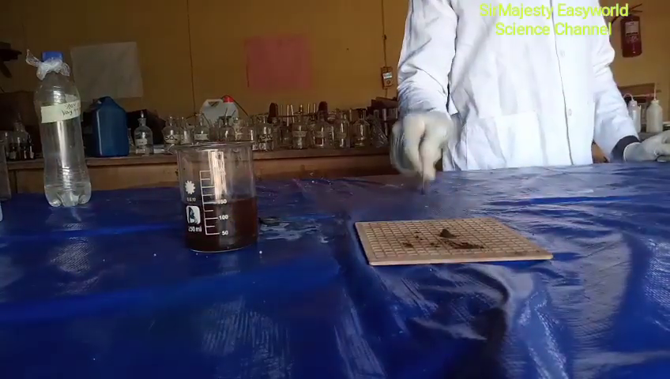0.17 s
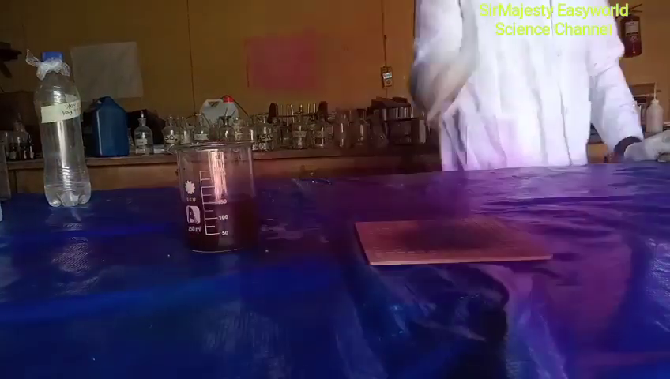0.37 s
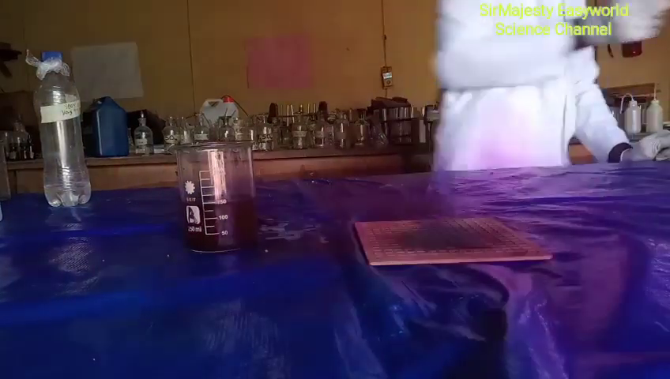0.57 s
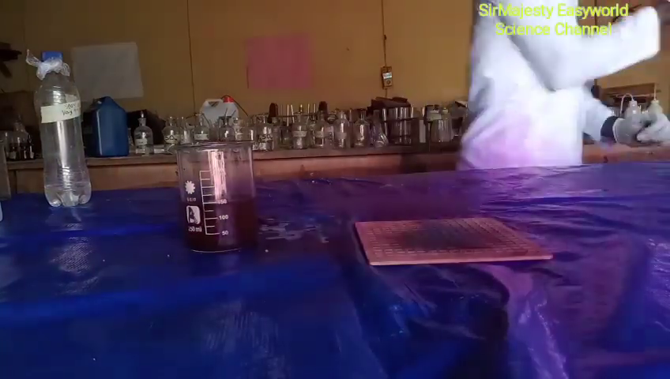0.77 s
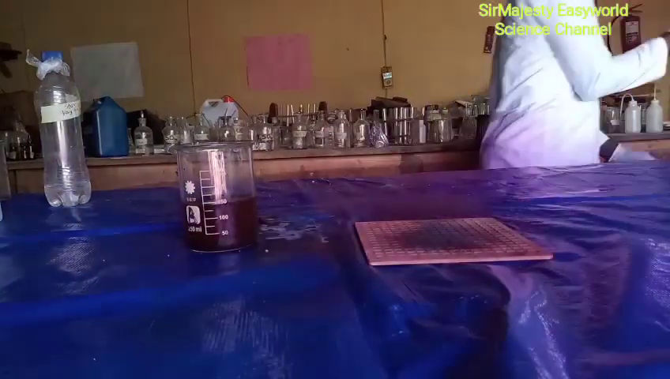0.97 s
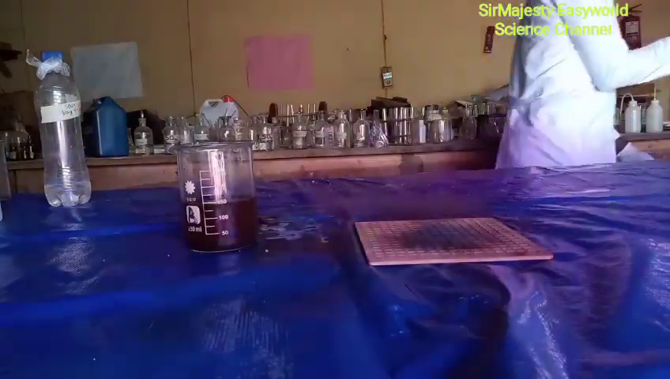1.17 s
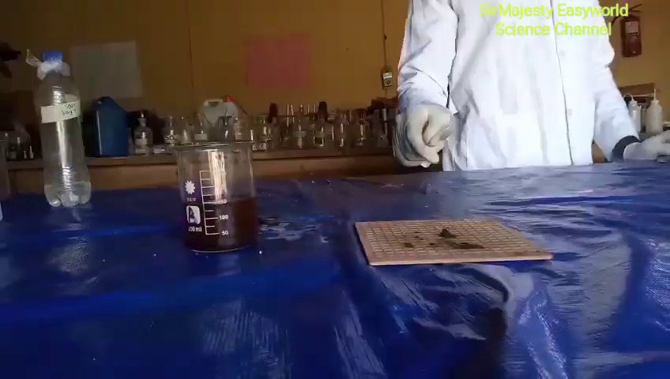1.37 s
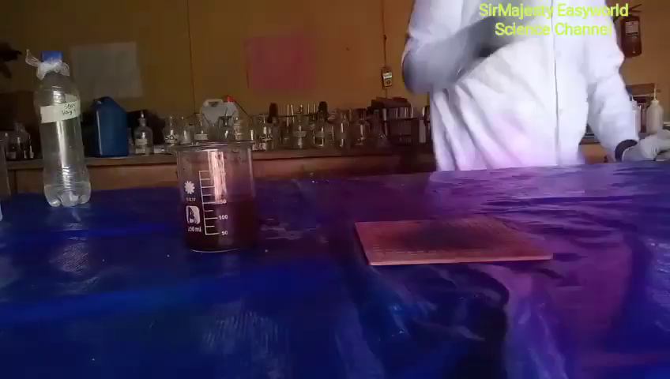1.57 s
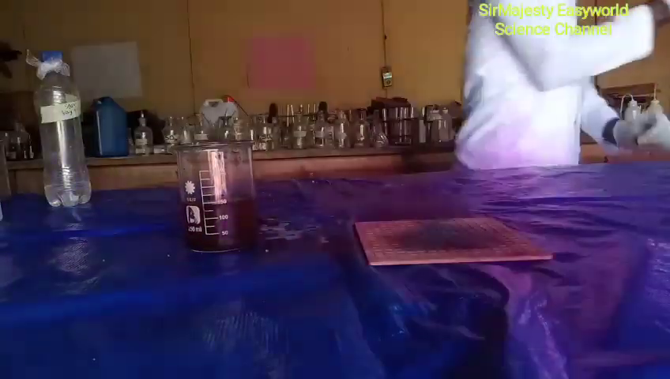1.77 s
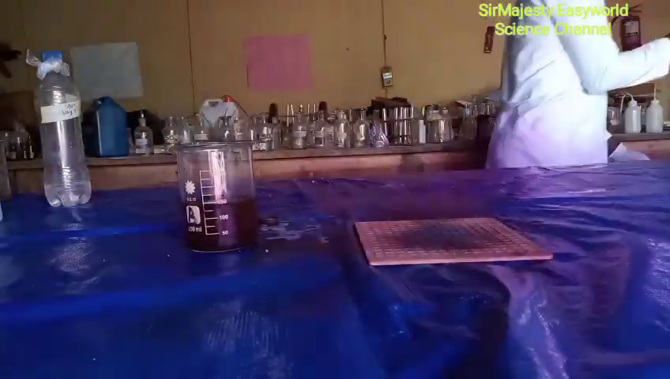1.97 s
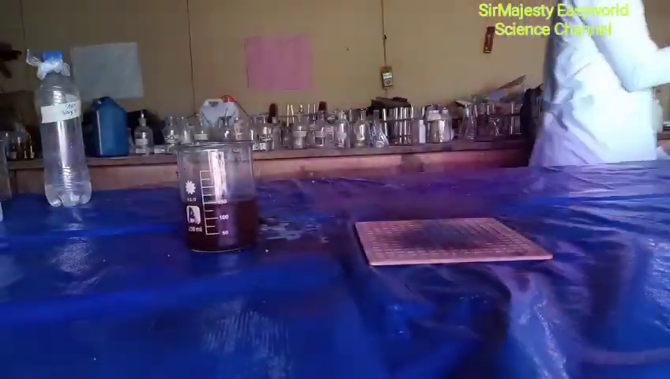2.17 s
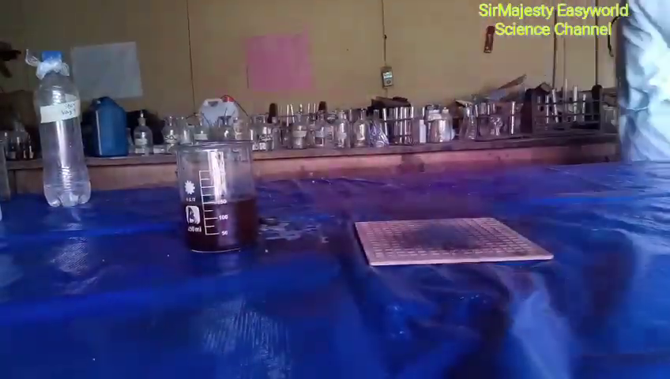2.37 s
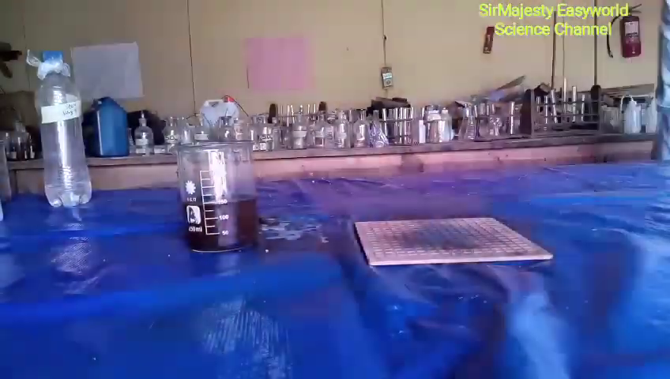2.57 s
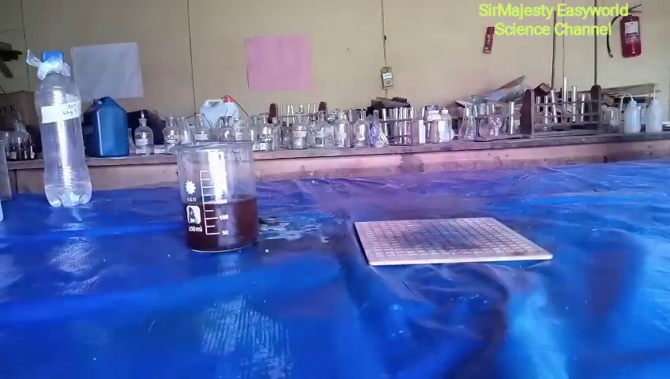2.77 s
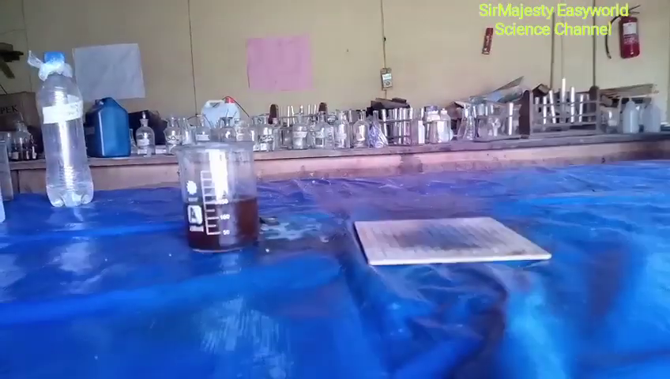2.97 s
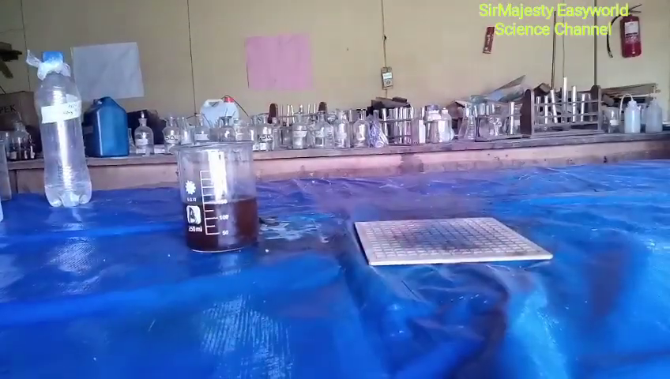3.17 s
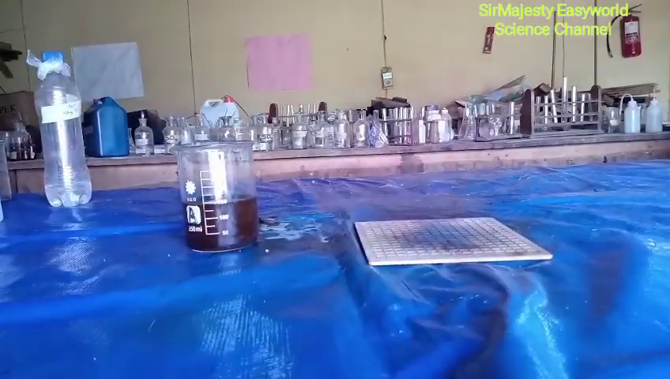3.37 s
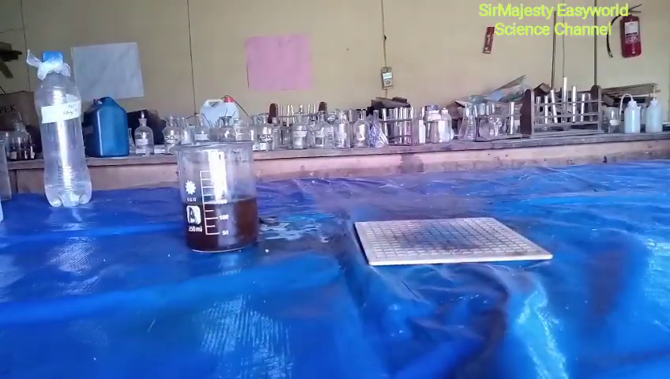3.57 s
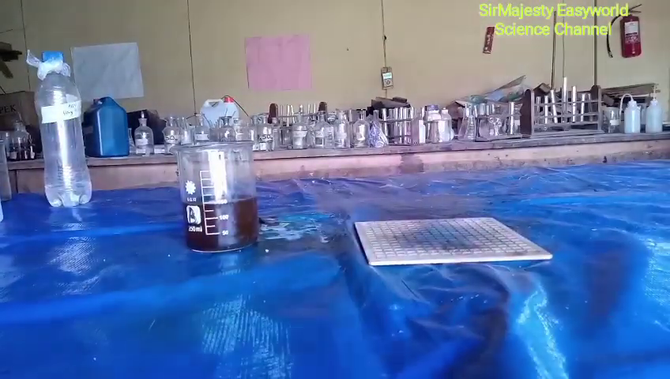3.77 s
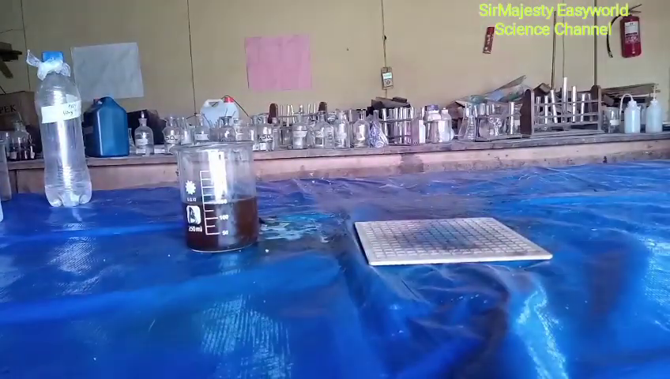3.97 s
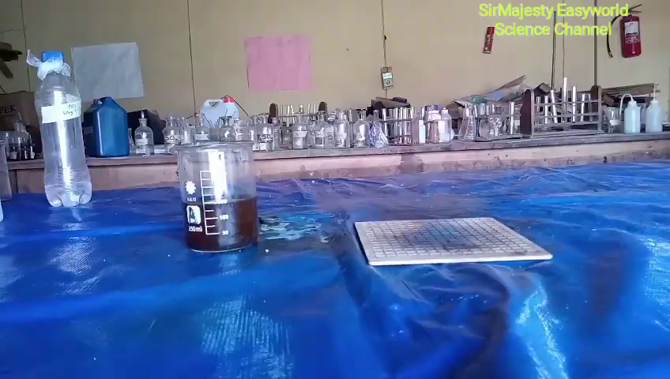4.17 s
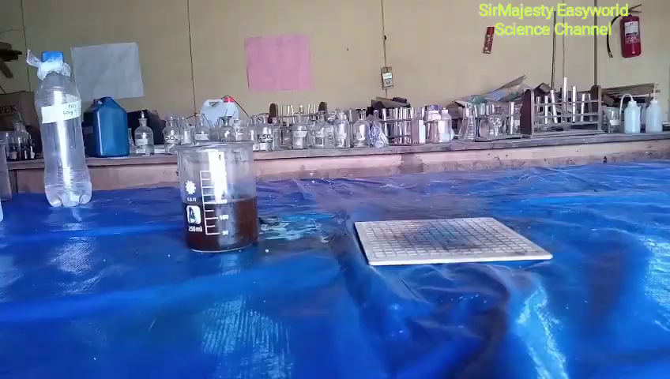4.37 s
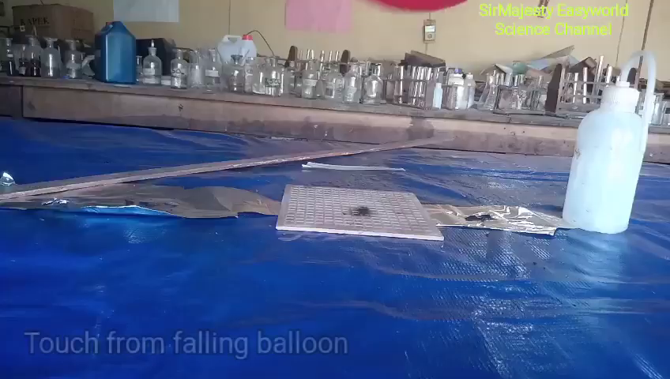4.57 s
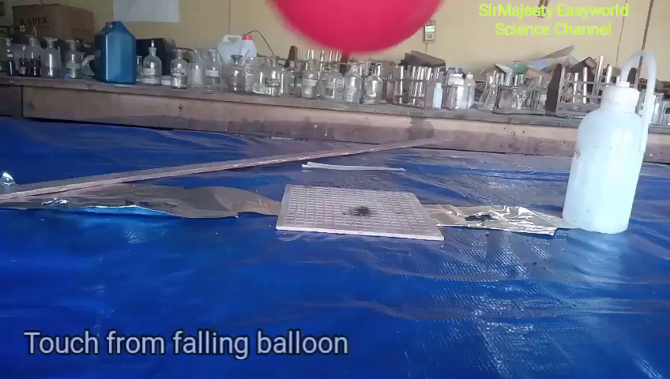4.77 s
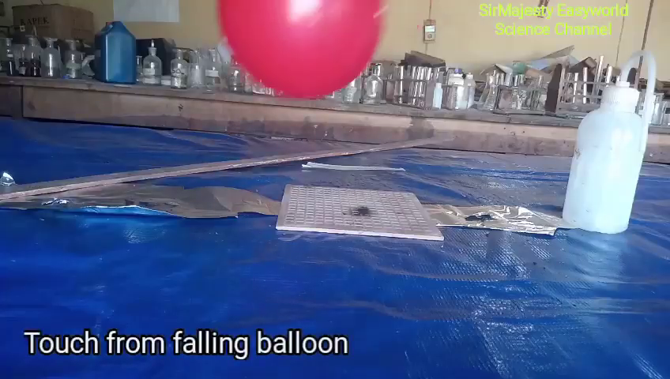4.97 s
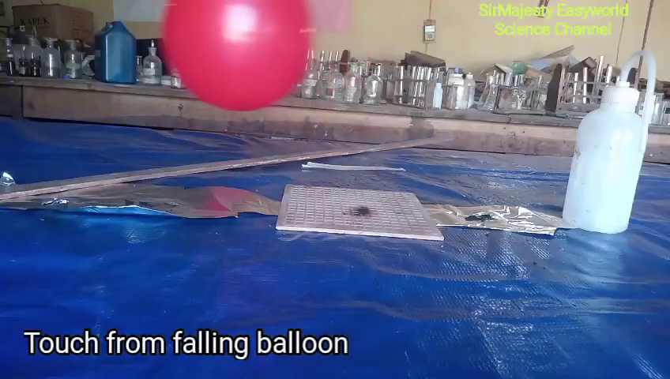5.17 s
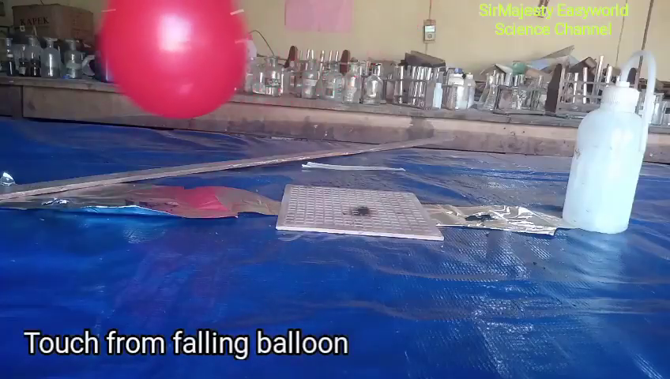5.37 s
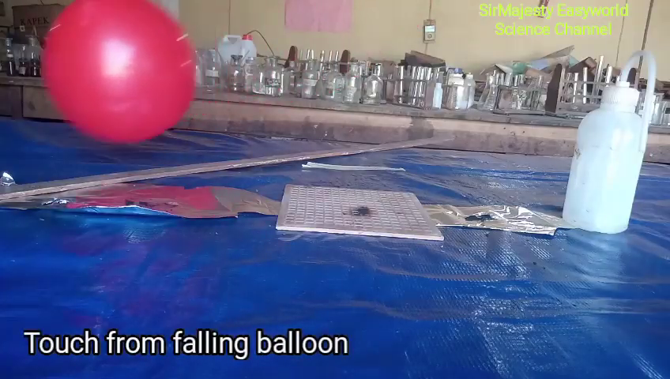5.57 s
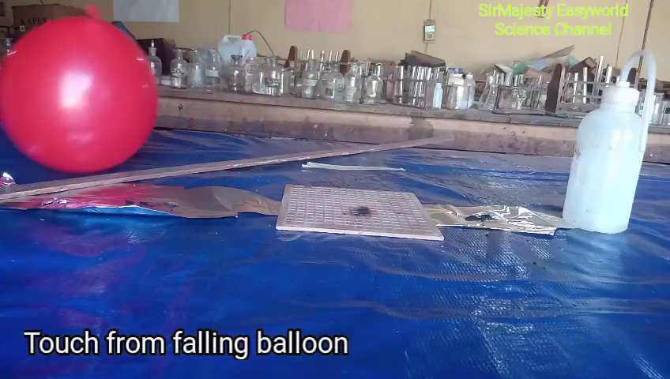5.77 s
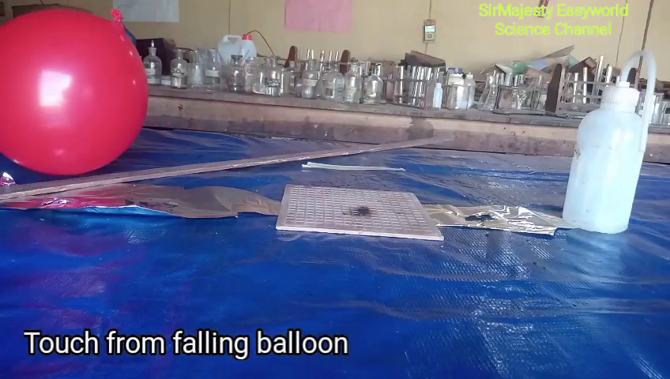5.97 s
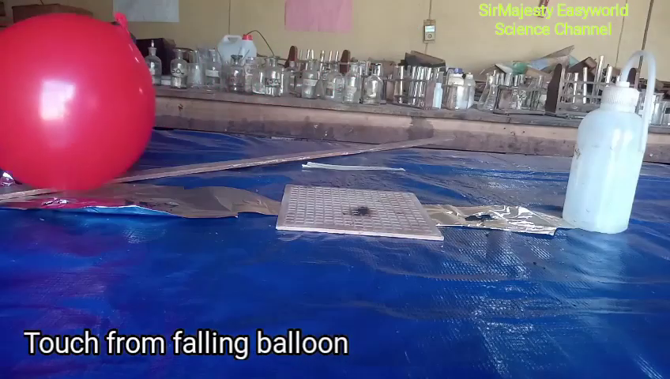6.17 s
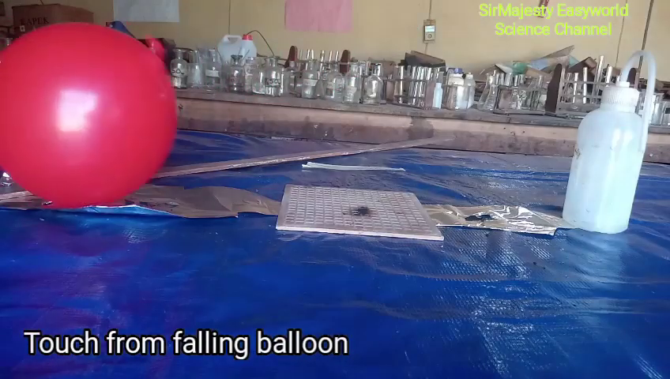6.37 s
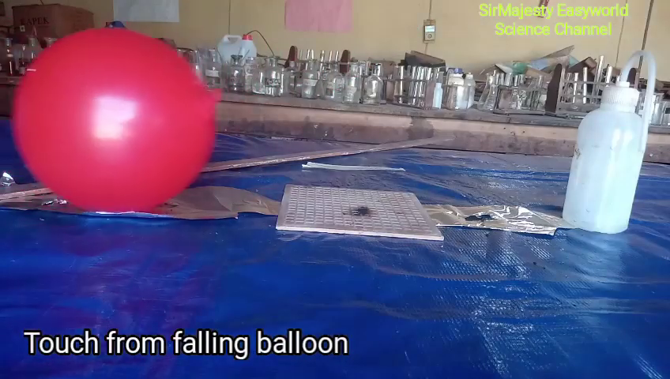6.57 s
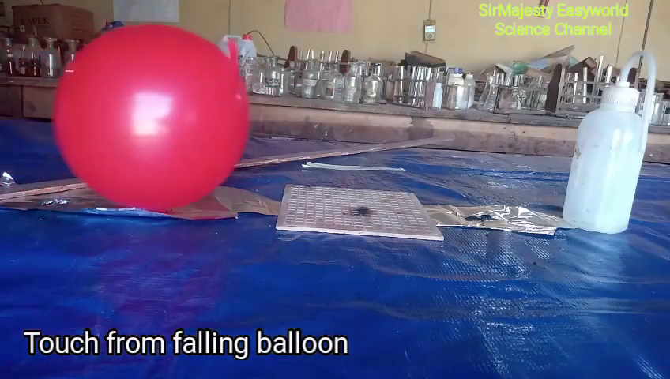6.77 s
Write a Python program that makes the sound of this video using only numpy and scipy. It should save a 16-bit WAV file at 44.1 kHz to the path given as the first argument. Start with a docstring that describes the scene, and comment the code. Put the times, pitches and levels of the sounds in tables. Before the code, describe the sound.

A phone microphone captures two tiny powder detonations in a bare-walled lab: tap, huge clipped bang, decaying roar, then a quick cut and a shorter, faster version. The hush after holds soft building rumble, clothing strokes, small ticks, regular faint clicks and far bird notes. The sound cuts dead, then a small engine hums and throbs roughly nearby, while a balloon skin brushes past with two sharp ticks.

```python
"""In a hard-walled lab, a small powder pile detonates on a tile after a tap of the tool, then replays faster:
the tap comes closer to the blast and the ring dies away sooner. Each blast is a shock pulse with decaying
room noise and ringing glass, and overloads a phone microphone. Behind it the building rumbles, clothes
rustle (both shaped noise) and a far bird sings in rough glides. After a silent cut a small generator drones
nearby, harmonics plus throbbing noise, and a balloon brushes past as bright crackling noise."""
import sys
import numpy as np
from scipy import signal
from scipy.fft import rfft, irfft, next_fast_len
from scipy.io import wavfile
from scipy.ndimage import uniform_filter1d, map_coordinates

SR = 44100
rng = np.random.default_rng(int(sys.argv[2]) if len(sys.argv) > 2 else 0)


def nominal_scale(level):
    """Amplitude ratio for a level in decibels (scalar or array-like)."""
    x = np.asarray(level, float) / 20
    return 10 ** x


def generate_wav(sig):
    """Save sig (samples, or channels by samples) to the path in sys.argv[1] as 16-bit PCM at SR."""
    pcm = np.round(np.clip(np.atleast_2d(sig).T, -1, 1) * 32767).astype(np.int16)
    wavfile.write(sys.argv[1], SR, pcm)


N = 304290  # length [samples]
T = np.arange(N) / SR  # time [s]


def unit(x):
    """Scale to rms 1."""
    return x / np.sqrt(np.mean(x ** 2) + 1e-20)


def along(points, hz):
    """(Hz, value) points read on a log frequency axis."""
    f, v = np.transpose(points)
    return np.interp(np.log(hz + 1), np.log(f + 1), v)


def wobble(rate):
    """A smooth random curve, rate knots a second."""
    knots = rng.standard_normal(int(N * rate / SR) + 4)
    return map_coordinates(knots, [T * rate])


def coloured(x, spectrum):
    """x through a (Hz, dB) spectrum, causal: the folded cepstrum gives the least delay."""
    m = 2 * next_fast_len(len(x) // 2 + 8192)
    gain_db = along(spectrum, np.fft.rfftfreq(m, 1 / SR))
    cepstrum = irfft(np.log(nominal_scale(gain_db)), m)
    cepstrum[1:m // 2] *= 2
    cepstrum[m // 2 + 1:] = 0
    return irfft(rfft(x, m) * np.exp(rfft(cepstrum)), m)[:len(x)]


def swells(rows, rise_s, fall_db_per_s):
    """Gain of events that rise, hold and die away."""
    total = 0
    for s, held, db in rows:
        fall_db = fall_db_per_s * np.clip(T - s - held, 0, None)
        total = total + nominal_scale(db - fall_db) * np.clip((T - s) / rise_s, 0, 1)
    return total


def loudness(x, size):
    """Running rms of the last size samples."""
    return np.sqrt(np.abs(uniform_filter1d(x ** 2, size=size, origin=size // 2)) + 1e-12)


def add(track, s, sound):
    """Mix a sound in at time s."""
    part = track[round(s * SR):][:len(sound)]
    part += sound[:len(part)]


# the hard walls' decay at pace 1: (frequency [Hz], t60 [s])
LAB_DECAY = [(60, 0.4), (250, 0.65), (1000, 0.77), (2500, 0.72), (5500, 0.65), (9000, 0.43)]


def tail(spectrum, pace):
    """Room noise starting at rms 1, each frequency dying at its own rate times pace."""
    hz, t, z = signal.stft(rng.standard_normal(2 * SR), SR, nperseg=512)
    decay_db = 60 * pace * t / along(LAB_DECAY, hz)[:, None]
    z = z * nominal_scale(along(spectrum, hz)[:, None] - decay_db)
    sound = signal.istft(z, SR, nperseg=512)[1][:2 * SR]
    return sound / np.std(sound[:1024])


def in_room(x, wet_db, pace):
    """x and the lab's answer to it."""
    room = tail([(500, 0)], pace)  # one level at all frequencies
    return x + nominal_scale(wet_db) * signal.fftconvolve(x, room / np.linalg.norm(room))[:N]


# still air: (frequency [Hz], relative density [dB per Hz])
STILL_SPECTRUM = [(100, -22.5), (280, -2.5), (500, -10.5), (1500, -15.5), (3000, -20.5), (5500, -17),
                  (7000, -18.5), (16000, -25)]


def still_air():
    """The lab's noise floor, a steady noise that wavers slightly."""
    return nominal_scale(-67.0 + 1.5 * wobble(6.1)) * unit(coloured(rng.standard_normal(N), STILL_SPECTRUM))


# swells of the building: (start [s], time from start to fall [s], level [dB])
RUMBLE_SWELLS = [(-.02, .3, -49.5), (.36, 0.039, -61), (1.23, 0.06, -56), (1.32, 0.047, -61),
                 (1.52, 0.089, -55), (1.67, 0.059, -48), (2.17, 0.064, -55), (2.36, .05, -56.5),
                 (2.46, 0.036, -59.5), (2.54, .2, -56), (2.94, .08, -54), (3.09, 0.057, -62),
                 (3.36, 0.11, -60.5), (3.82, 0.053, -68), (4.0, .1, -53), (4.16, 0.13, -53),
                 (4.36, 0.073, -63)]
# its colour: (frequency [Hz], relative density [dB per Hz])
RUMBLE_SPECTRUM = [(15, -28.5), (40, -11.5), (62, 10), (90, -6.5), (150, -6), (250, -22), (600, -31),
                   (1500, -52.5)]


def rumble():
    """The building's low noise, lumpy, swelling over a faint rest level."""
    rest_db = -67
    lumps = nominal_scale(rest_db) + swells(RUMBLE_SWELLS, rise_s=0.03, fall_db_per_s=300.5)
    return lumps * nominal_scale(2.5 * wobble(30)) * unit(coloured(rng.standard_normal(N), RUMBLE_SPECTRUM))


# far bird's notes: (start [s], end [s], first pitch [Hz], last pitch [Hz], level [dB])
BIRD_NOTES = [(2.348, 2.43, 3360, 3440, -60.5), (2.5, 2.59, 3575, 3220, -53.5),
              (2.581, 2.718, 3000, 2816, -63.5), (2.91, 3.014, 3280, 3420, -61.5),
              (3.02, 3.082, 3440, 3450, -55), (3.079, 3.15, 2950, 3130, -63.5),
              (3.198, 3.299, 3390, 3340, -61), (3.249, 3.335, 3015, 2885, -61.5)]


def bird():
    """Far, gliding notes, roughened by noise around their pitch and smeared by the walls."""
    blur = 550  # knots a second of the noise that widens each note
    out = np.zeros(N)
    for start, stop, first_hz, last_hz, db in BIRD_NOTES:
        u = (T - start) / (stop - start)  # 0 to 1 over the note
        phase = 2 * np.pi * np.cumsum(first_hz + (last_hz - first_hz) * u) / SR
        shape = np.clip(6 * np.minimum(u, 1 - u), 0, 1)
        rough_tone = wobble(blur) * np.cos(phase) + wobble(blur) * np.sin(phase)
        out += nominal_scale(db + 3.45 * wobble(50)) * shape * unit(rough_tone)
    return in_room(out, wet_db=-7.5, pace=2.5)


# strokes of cloth: (start [s], time from start to fall [s], level [dB])
RUSTLE_STROKES = [(1.4, 0.037, -47), (2.345, 0.054, -48.5), (2.49, 0.16, -46), (2.7, 0.077, -70),
                  (2.9, 0.09, -51.5), (3.113, 0.026, -56), (3.295, 0.018, -63), (3.39, 0.017, -64),
                  (3.512, .04, -58), (3.565, 0.036, -49), (3.65, .08, -67.5), (4.05, .02, -56),
                  (4.14, .04, -58.5), (4.2, 0.092, -66), (4.43, .07, -66.5)]
# cloth's colour: (frequency [Hz], relative density [dB per Hz])
CLOTH_SPECTRUM = [(600, -43.5), (1500, -18), (2500, -21), (4000, -7), (5500, -2), (8000, -5), (16000, -9.5)]


def rustle():
    """Clothes: strokes of bright noise, each with a rough surface."""
    strokes = swells(RUSTLE_STROKES, rise_s=0.023, fall_db_per_s=263)
    return strokes * nominal_scale(0.85 * wobble(110)) * unit(coloured(rng.standard_normal(N), CLOTH_SPECTRUM))


# engine orders: (multiple of the firing rate, level at 5.7 s [dB], drift [dB per s])
ENGINE_ORDERS = [(2, -52.5, 1.5), (4, -57, -5), (5, -61.5, -8), (6, -50, -3.5), (7, -53, -7),
                 (8, -40.5, 2.5), (9, -46.5, 5.5), (10, -52.5, 8), (12, -43.5, 0.6), (13, -57.5, 3),
                 (14, -51.5, -6.5), (17, -60.5, 11), (18, -57, -4), (20, -46, 7), (22, -75, 10),
                 (26, -65.5, -12), (28, -49.5, 0.5), (40, -48.5, 1.3)]
# exhaust roar: (frequency [Hz], relative density [dB per Hz])
ROAR_SPECTRUM = [(15, -33.5), (40, -16), (92, -9), (190, -8.5), (363, -14), (775, -12), (900, -11.5),
                 (1400, -12.5), (1800, -20), (4000, -16.5), (8000, -21), (16000, -25)]


def generator():
    """Orders of the firing rate drift and waver in strength; the exhaust roar throbs once a firing."""
    firing_hz, sag_from_s, sag_hz_per_s = 23.23, 5.25, 0.27
    roar_db = -35.5
    hz = firing_hz - sag_hz_per_s * np.clip(T - sag_from_s, 0, None)
    phase = 2 * np.pi * np.cumsum(hz) / SR
    since = T - 5.7
    tones = 0
    for order, db, drift in ENGINE_ORDERS:
        strength = nominal_scale(db + drift * since + 2.46 * wobble(2.8))
        tones = tones + strength * np.sin(round(order) * phase + 0.54 * wobble(3.7))
    throb = 1 + 0.047 * np.cos(phase) + 0.023 * np.cos(2 * phase)
    noise = unit(coloured(rng.standard_normal(N), ROAR_SPECTRUM))
    return tones + nominal_scale(roar_db + 0.61 * wobble(12)) * throb * noise


# a balloon's skin brushes past: (start [s], time from start to fall [s], level [dB])
BALLOON_BRUSHES = [(5.575, .085, -29), (5.79, .05, -33)]
# single ticks of rubber: (time [s], level [dB])
RUBBER_TICKS = [(5.607, -17), (5.641, -18)]


def balloon():
    """A short bright crackle of rubber: twice-differenced noise in brushes and ticks."""
    noise = unit(np.diff(rng.standard_normal(N + 2), 2))
    ticks = swells([(s, 0, db) for s, db in RUBBER_TICKS], rise_s=0.00024, fall_db_per_s=6000)
    brushes = swells(BALLOON_BRUSHES, rise_s=0.02, fall_db_per_s=600) * nominal_scale(4 * wobble(60))
    return (brushes + ticks) * noise


# tool on tile: (time [s], relative level [dB])
TOOL_TAPS = [(0.1242, -22.5), (0.1296, -23), (1.523, -36.5), (1.532, -38.5), (1.543, -38.5), (2.53, -41),
             (2.553, -48), (3.985, -54.5), (4.055, -55), (4.161, -55), (4.22, -55)]
# the tile's modes: (frequency [Hz], relative level [dB], t60 [s])
TILE_MODES = [(619, -16, .03), (1265, -14, .02), (1744, -7, .035), (2800, -10, .012), (3316, -2, .014),
              (4565, -6, .018), (5260, -5, .014), (6379, -10, .014)]
# falling crumbs: (time [s], level [dB])
CRUMB_FALLS = [(0.101, -40.5), (1.4017, -56.5), (2.281, -30), (3.063, -52), (3.1183, -58), (3.5182, -59.5),
               (3.5733, -46), (4.0527, -60)]


def taps():
    """The tool knocks the tile's modes; crumbs land as bright ticks; the room answers both."""
    out, t = np.zeros(N), np.arange(SR // 4) / SR
    for s, db in TOOL_TAPS:
        ring = 0
        for hz, mode_db, t60 in TILE_MODES:
            ring = ring + nominal_scale(mode_db + rng.normal(0, 1.4) - 60 * t / t60) * np.sin(2 * np.pi * hz * t)
        knock_noise = nominal_scale(0.5 - 60 * t / 0.024) * np.diff(rng.standard_normal(len(t) + 1))
        add(out, s, nominal_scale(db - 5.0) * (ring + knock_noise))
    for s, db in CRUMB_FALLS:
        add(out, s, nominal_scale(db - 60 * t / 0.0076) * np.diff(rng.standard_normal(len(t) + 1)))
    return in_room(out, wet_db=-7, pace=1.7)


# the blast and its faster replay: (time [s], level [dB], playback pace, heard in the decay [1 = normal])
BLAST_AND_REPLAY = [(0.4848, 21.5, 0.98), (1.7287, 20, 1.64)]
# the room's answer to the blast: (frequency [Hz], relative density [dB per Hz])
BLAST_ANSWER = [(30, -45), (70, -46), (140, -15), (250, -18.5), (400, -16.5), (1150, -10.5), (2000, -7.5),
                (3000, -11.5), (8000, -11.5), (16000, -14.5)]
# glassware left ringing: (frequency [Hz], relative level [dB], t60 at pace 1 [s])
GLASS_MODES = [(2024, -40, 1.27), (4877, -52, 1.3)]


def blasts():
    """A shock front, a strong early burst, the long room answer and shaken glass; pace shortens the decays."""
    out, t = np.zeros(N), np.arange(2 * SR) / SR
    for s, db, pace in BLAST_AND_REPLAY:
        shock = (1 - t / 0.0011) * np.exp(-t / 0.0004)
        early = 1 + nominal_scale(-5.5 - 60 * pace * t / 1.0)
        glass = 0
        for hz, glass_db, t60 in GLASS_MODES:
            glass = glass + nominal_scale(glass_db - 60 * pace * t / t60) * np.sin(2 * np.pi * hz * t)
        blast = shock + early * tail(BLAST_ANSWER, pace) + glass
        next_cut = min(start for start, _, _ in SILENT_CUTS if start > s)
        add(out, s, nominal_scale(db) * blast * (s + t < next_cut))  # the ring ends at the next cut
    return out


def scene():
    """Lab background up to the last cut, generator after it, and all the single events, one channel."""
    in_lab = T < SILENT_CUTS[-1][0]
    background = (still_air() + rumble() + rustle()) * in_lab + generator() * ~in_lab
    return (background + bird() + balloon() + taps() + blasts())[None]


# phone microphone, a port resonance, then a steep fall: (frequency [Hz], gain [dB])
MICROPHONE_RESPONSE = [(3000, 0.43), (4000, -4), (4800, 0.5), (5600, 7), (6300, -1), (7300, -9),
                       (8300, -20), (12000, -35), (15300, -23.5), (16000, -30.5)]


def microphone(x):
    """Colours the sound; gain control holds loud sound at one level as far as its range goes."""
    x = coloured(x, MICROPHONE_RESPONSE)
    gain_db = np.clip(-19 - 20 * np.log10(loudness(x, size=1301)), -12, 0)
    return x * nominal_scale(uniform_filter1d(gain_db, size=441))


# filter after the overloaded stage: (frequency [Hz], gain [dB])
OUTPUT_RESPONSE = [(30, -0.5), (75, -6), (140, 1.5), (400, 0), (1000, 0), (6500, 1.68), (8000, -7),
                   (15000, -13), (16700, -11.5), (16900, -68)]


def overload(x):
    """Peaks flatten against a limit with a rounded knee, then pass the output filter."""
    limit, hardness = 0.66, 6.6
    x = x / (1 + np.abs(x / limit) ** hardness) ** (1 / hardness)
    return coloured(x, OUTPUT_RESPONSE)


# thin treble fizz: (frequency [Hz], relative density [dB per Hz])
FIZZ_SPECTRUM = [(6000, -39), (7500, -2.5), (9000, -8), (11000, -15), (12500, -6), (13800, -13.5),
                 (15100, -2.5), (15450, -3.5), (15600, -50.5)]


def fizz(level):
    """Treble noise that follows the loudness."""
    return nominal_scale(-38.0) * level * unit(coloured(rng.standard_normal(N), FIZZ_SPECTRUM))


def add_clicks(x, level):
    """Every fifth of a second up to the last cut, a click about as strong as what is sounding."""
    at = np.round(np.arange(0.6795, 4.4, 0.2) * SR).astype(int)
    x[at] += nominal_scale(rng.normal(-1.5, 3, len(at))) * level[at]
    return x


# silent cuts: (start [s], end [s], fade-in after the end [s])
SILENT_CUTS = [(1.492, 1.509, 0.0068), (4.507, 4.519, 0.014)]


def silence_cuts(x):
    """Sound stops dead at each cut and fades in after it."""
    for start, stop, fade in SILENT_CUTS:
        x = x * np.where(T < start, 1, np.clip((T - stop) / fade, 0, 1))
    return x


def roll_off(x):
    """The treble ends steeply here."""
    return signal.sosfilt(signal.butter(12, 16740, fs=SR, output="sos"), x)


def record(dry):
    """The phone: microphone, overload, hiss of the electronics, fizz, clicks and silent cuts."""
    x = overload(microphone(dry[0]))
    x = x + nominal_scale(-91.5) * np.diff(rng.standard_normal(N + 1))  # hiss
    level = loudness(x, size=441)
    x = add_clicks(x + fizz(level), level)
    mix = silence_cuts(np.clip(x, -1, 1))
    return roll_off(mix[None])


dry = scene()
out = record(dry)
generate_wav(out)
```